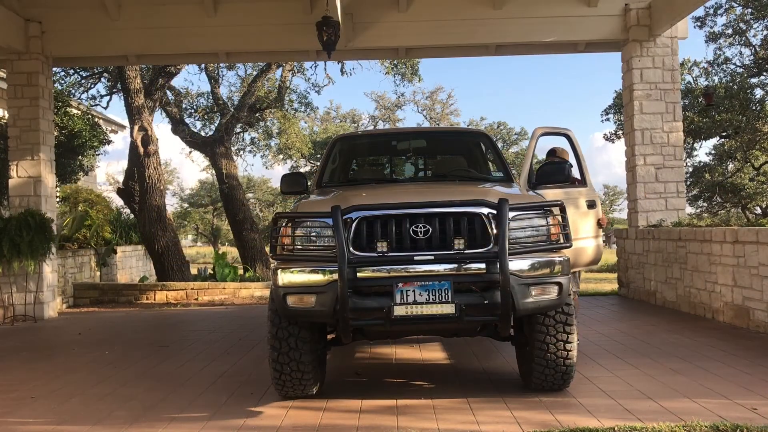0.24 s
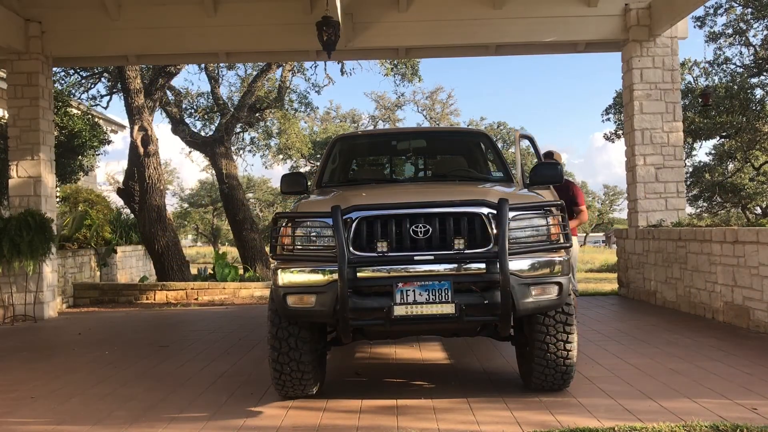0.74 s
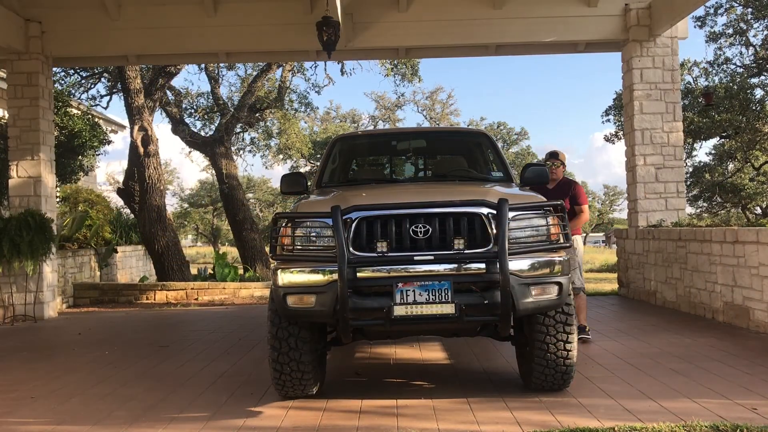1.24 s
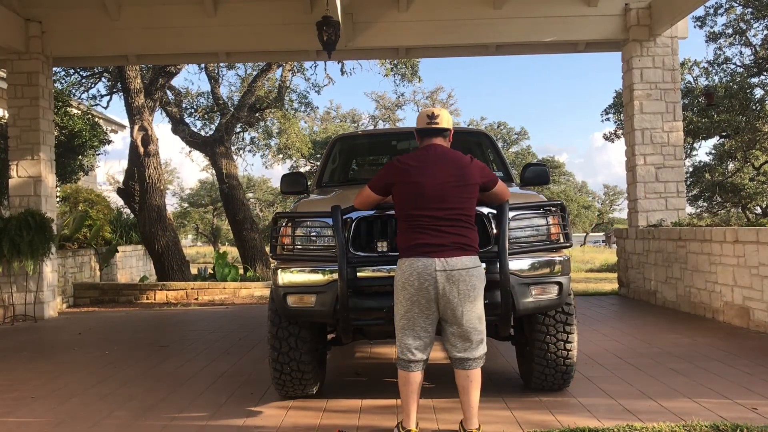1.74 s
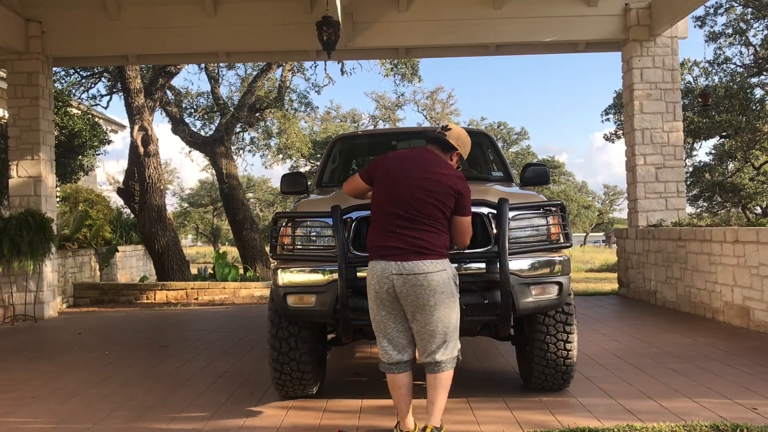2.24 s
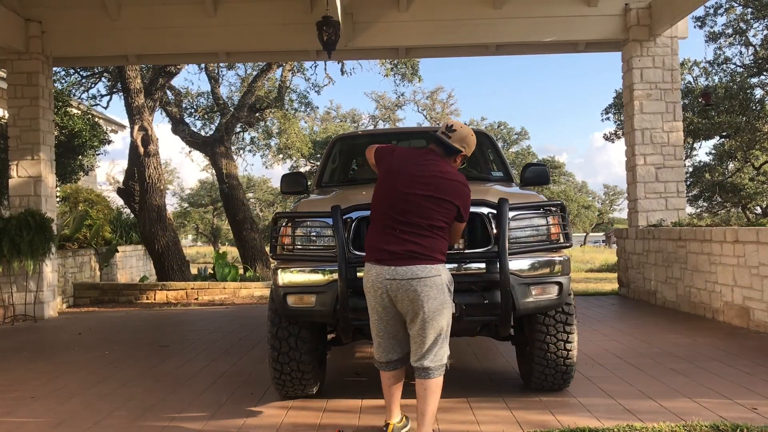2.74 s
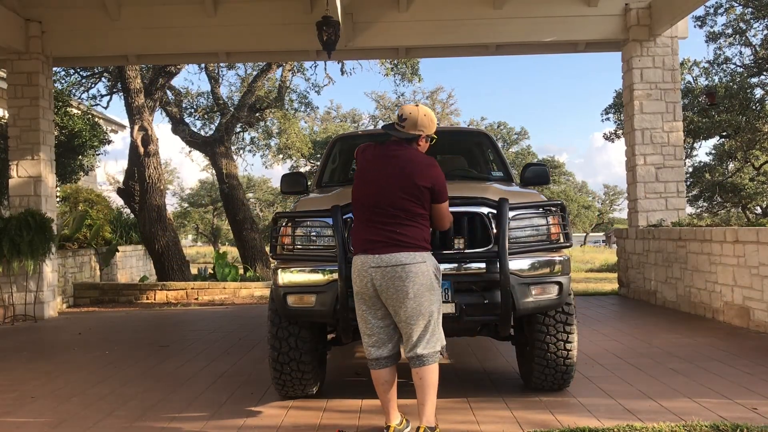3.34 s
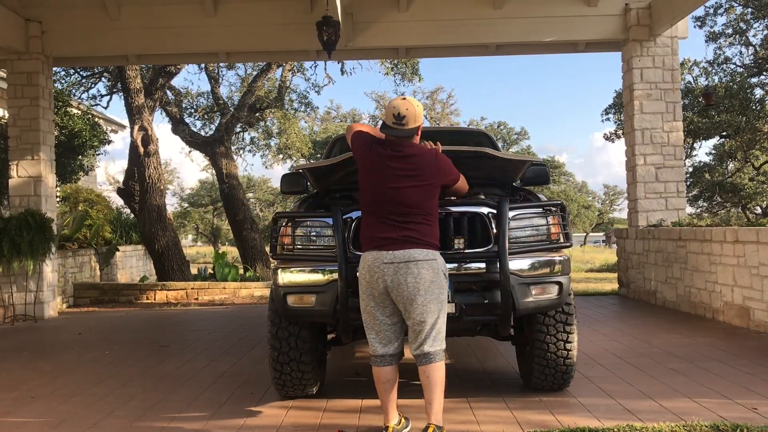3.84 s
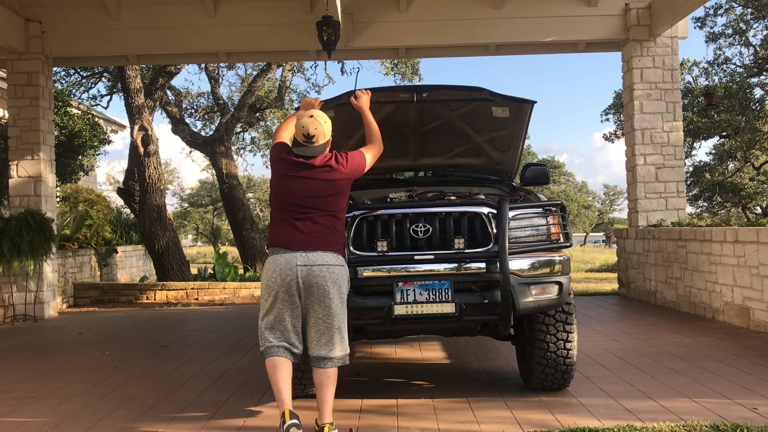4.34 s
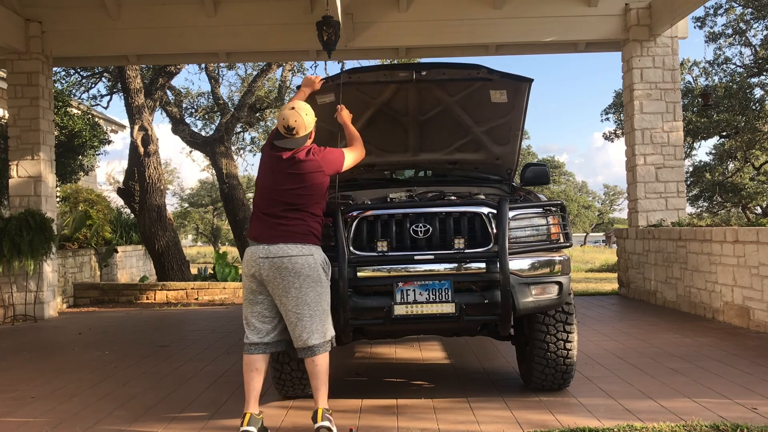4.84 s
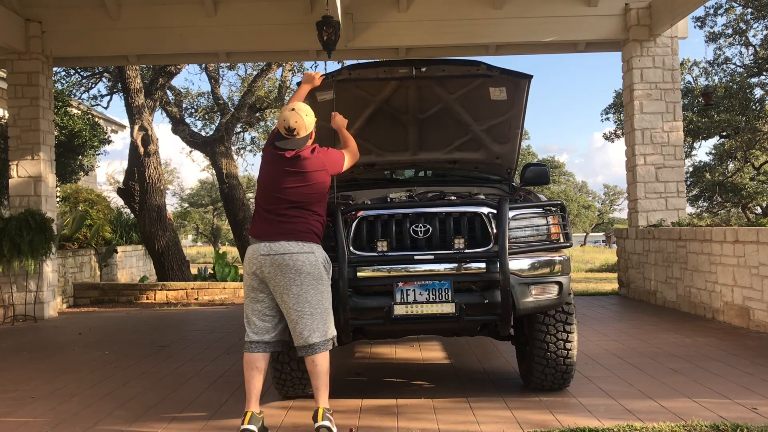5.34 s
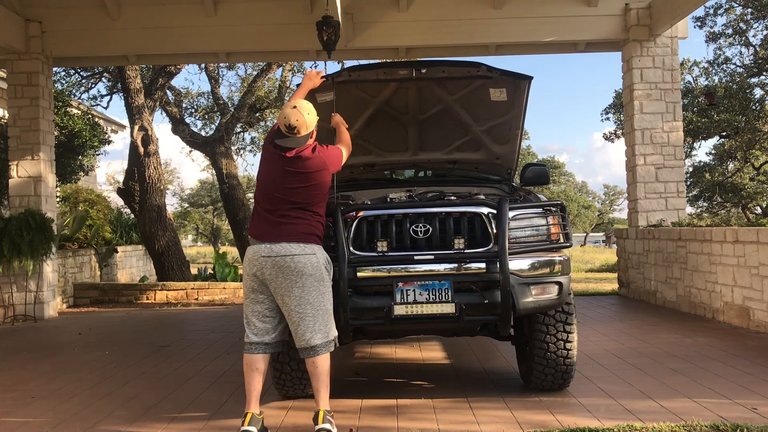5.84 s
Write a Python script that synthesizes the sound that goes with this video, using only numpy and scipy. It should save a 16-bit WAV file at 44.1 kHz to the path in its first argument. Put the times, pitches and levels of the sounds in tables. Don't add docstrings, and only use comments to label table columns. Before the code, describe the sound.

Pickup door slams with a heavy thud under a stone carport, then a hood latch clacks free and a metal prop rod knocks into place.

```python
import sys
import numpy as np
from scipy import signal
from scipy.fft import rfft, irfft, next_fast_len
from scipy.io import wavfile
from scipy.ndimage import uniform_filter1d

SR = 44100
rng = np.random.default_rng(int(sys.argv[2]) if len(sys.argv) > 2 else 0)


def invert_db(level):
    return 10 ** (np.asarray(level, dtype=float) / 20)


def put_to_file(sound):
    columns = np.atleast_2d(sound).T
    safe = np.clip(columns, -1, 1)
    whole_steps = np.round(safe * 32767)
    wavfile.write(sys.argv[1], SR, whole_steps.astype(np.int16))


N = 269186
SKIN_HZ, FRAME_HZ, LATCH_HZ = 302, 646, 987


def unit(x):
    return x / np.sqrt(np.mean(x ** 2))


def peak(x, db):
    return x * invert_db(db) / np.max(np.abs(x))


def band(x, lo_hz, hi_hz, order=2):
    return signal.sosfilt(signal.butter(order, [lo_hz, hi_hz], "band", fs=SR, output="sos"), x)


def die_away(t, t60):
    return np.exp(-np.log(1000) * t / t60)


def gain_at(points, hz):
    f, db = np.transpose(points)
    return invert_db(np.interp(np.log(hz + 1), np.log(f), db))


def coloured(points):
    size = next_fast_len(N)
    hz = np.arange(size // 2 + 1) * SR / size
    spectrum = rfft(rng.standard_normal(size)) * gain_at(points, hz)
    return unit(irfft(spectrum, size)[:N])


def walk(rate):
    k = int(SR / rate)
    steps = np.repeat(rng.standard_normal(N // k + 1), k)
    return unit(uniform_filter1d(uniform_filter1d(steps, k), k)[:N])


def add(out, s, x):
    i = int(s * SR)
    out[i:i + len(x)] += x[:N - i]


def ring(hz, octaves, t60, t, count):
    shift, size = rng.uniform(-1.038, 1, size=(2, count, 1))
    place = np.linspace(-1, 1, count)[:, None] + shift / count
    f = hz * 2 ** (octaves * place)
    strength = size * (1.3 - place ** 2) * (f / hz) ** 0.091
    swing = np.sin(2 * np.pi * f * t)
    return np.sum(strength * swing * die_away(t * np.sqrt(f / hz), t60), axis=0)


def blows(table, panel_hz, t60, rise, gain_db):
    out, t = np.zeros(N), np.arange(SR // 4) / SR
    for s, db, panel_db, treble_db, decay in table:
        grit = rng.standard_normal(len(t)) * invert_db(3.55 * rng.exponential(size=len(t)))
        chatter = grit * np.exp(-t / max(decay, .001)) * np.minimum(t / rise, 1)
        clank = peak(band(chatter, 1370, 2644), -9.0)
        panel = ring(panel_hz, 1.1, t60, t[:3000], count=80)
        modes = peak(signal.fftconvolve(chatter, panel)[:len(t)], -9)
        wash = rng.standard_normal(len(t)) * np.exp(-t / (decay + 0.052 * t60))
        wash = wash * np.minimum(t / (2 * rise), 1)
        wash = peak(band(wash, panel_hz / 2.01, panel_hz * 1.49), 0)
        sheet = peak(modes + wash, panel_db - 0.5)
        top_hz = np.clip(5500 * invert_db(.25 * (treble_db + 25)), 4500, 14000)
        edge = peak(band(chatter, 2100, top_hz), treble_db + 18.0)
        first_touch = chatter * np.exp(-t / .004)
        snap = peak(band(first_touch, 6000, 15000, order=1), treble_db + 7)
        add(out, s - .5 * rise, invert_db(db + gain_db) * (clank + sheet + edge + snap))
    return out


def slams():
    # start in seconds, peak in dB, panel share in dB, treble share in dB, rattle decay in seconds
    skin = [
        (1.3018, -25.5, -6, -17, 0.0016),
        (3.2979, -47, 6, -14, 0.012),
        (3.6169, -16.5, -19, -25, 0.023),
        (3.6447, -26, -16, -45, 0.03),
        (3.6979, -25, -25.5, -40, .0055),
        (5.2616, -15.5, -40, -45.5, 0.0074),
    ]
    frame = [
        (3.0644, -31, -12, -50, 0.004),
        (5.5477, -29.5, -8.5, -48, 0.014),
        (5.6042, -35.5, -8.5, -23, 0.013),
        (5.7753, -31.5, -11.5, -37, .011),
        (6.0194, -28.5, -4.5, -25, 0.018),
    ]
    latch = [(1.8117, -30, -2.5, -10.5, 0.023), (3.0579, -29, -11, -17, 0.013),
             (3.2869, -43, 2.5, -16, 0.027), (3.6049, -15.5, -16.5, -28.5, 0.0023),
             (3.6114, -19.5, -12.5, -37.5, 0.005), (4.3824, -29, -20, -7.5, .007),
             (4.6247, -34.5, -16, -14, 0.011), (5.2512, -12.5, -14, -29.5, 0.01),
             (5.5558, -32.5, -8, -22, 0.012), (5.6396, -18, -15, -36, 0.018),
             (5.6544, -16, -12, -52, 0.012), (5.9939, -17.5, -2, -25, 0.0068),
             (6.0018, -26, 2.5, -21, 0.004)]
    out = np.zeros(N)
    for rows, hz in ((skin, SKIN_HZ), (frame, FRAME_HZ), (latch, LATCH_HZ)):
        out += blows(rows, hz, t60=0.11, rise=.003, gain_db=-1)
    return out


def drags():
    # start in seconds, peak in dB, panel share in dB, treble share in dB, rattle decay in seconds
    skin = [
        (1.3292, -25.5, -7.5, -18.5, 0.029),
        (1.4194, -29.5, -25, -26, 0.15),
        (1.7393, -33.5, -2.5, -33, 0.029),
        (1.8304, -29.5, -13.5, -25, 0.028),
        (1.8689, -36.5, -10.5, -19, 0.054),
    ]
    frame = [
        (1.2894, -30, -1, -34, 0.0098),
        (1.3058, -15.5, -11.5, -24, 0.055),
        (1.3694, -25.5, -7, -25, .022),
        (1.708, -35.5, -5.5, -21.5, 0.048),
        (1.7576, -37, -27, -40, 0.072),
        (3.0755, -34, -28, -36, 0.097),
        (3.3304, -47.5, -9.5, -28, 0.081),
        (5.5292, -44.5, 3.5, -29, 0.083),
    ]
    latch = [
        (2.1715, -43, -38, -21, 0.016),
        (2.3544, -40, -16, -30, 0.039),
        (2.4134, -45, -11, -26, 0.029),
        (2.5626, -46.5, -28, -36, 0.026),
        (2.8429, -47, -20, -16, 0.014),
        (4.1829, -39, -16, -32, 0.021),
        (4.1989, -34.5, -14.5, -32, 0.029),
        (4.2444, -45, -9, -16, 0.084),
    ]
    out = np.zeros(N)
    for rows, hz in ((skin, SKIN_HZ), (frame, FRAME_HZ), (latch, LATCH_HZ)):
        out += blows(rows, hz, t60=0.11, rise=.012, gain_db=-1.5)
    return out


def hood():
    # pitch in Hz, level in dB, t60 in seconds
    hood_modes = [(369, 8, 0.22), (677, -6.5, .13), (922, -6.5, 0.27), (941, -12, 0.32), (1166, 1.5, .09),
                  (1211, 5.5, 0.047), (1580, -5.5, 0.066), (1687, -4.5, 0.048), (1857, -9.5, 0.19),
                  (2158, -5.5, 0.084), (2273, -18, 0.24), (2425, -7, 0.076)]
    # start in seconds, peak in dB, favoured pitch in Hz, spread in octaves, contact time in seconds
    knocks = [
        (3.057, -44, 2190, 0.28, 0.015),
        (3.606, -27.5, 2220, .4, 0.023),
        (4.19, -44.5, 1380, 0.76, 0.033),
        (5.2515, -23.5, 2100, 1.22, 0.011),
        (5.547, -36.5, 1200, 1.11, 0.016),
        (5.642, -29.5, 1410, 0.94, 0.016),
        (5.776, -42.5, 1700, 0.31, 0.0024),
        (5.9936, -21.5, 1050, 0.37, 0.0034),
    ]
    out, t = np.zeros(N), np.arange(SR // 4) / SR
    hz, mode_db, t60 = np.transpose(hood_modes)[:, :, None]
    for s, db, centre_hz, spread, contact in knocks:
        mix_db = mode_db - 6 * (np.log2(hz / centre_hz) / spread) ** 2
        modes = invert_db(mix_db) * np.sin(2 * np.pi * hz * t) * die_away(t, t60)
        rattle = rng.standard_normal(2000) ** 3 * np.exp(-t[:2000] / contact)
        add(out, s, peak(signal.fftconvolve(modes.sum(axis=0), rattle), db))
    return out


def thuds():
    # start in seconds, peak in dB, pitch in Hz, t60 in seconds
    shakes = [(1.298, -26.5, 186.7, 0.39), (1.3, -18.5, 546, 0.15), (1.302, -25, 93.7, 0.36),
              (1.312, -19, 53, 0.2), (1.362, -22, 66, 0.22), (1.437, -25.5, 48.6, 0.5),
              (1.451, -32.5, 120, 0.17), (1.567, -31.5, 56.3, 0.15), (1.62, -32, 52.7, 0.054),
              (1.728, -30, 116, 0.16), (1.818, -32.5, 217, 0.054), (1.706, -37.5, 279, 0.22),
              (1.781, -43, 89, 0.45), (1.809, -34, 132.3, 0.5), (3.29, -40, 166.3, 0.37),
              (3.472, -45, 654, .08), (3.485, -46, 473, 0.13), (3.622, -44.5, 200, 0.43),
              (4.62, -40.5, 295, 0.014)]
    out, t = np.zeros(N), np.arange(SR // 2) / SR
    for s, db, hz, t60 in shakes:
        push = np.hanning(int(SR / hz / 3))
        main = np.sin(2 * np.pi * hz * t) * die_away(t, t60)
        neighbours = ring(hz, min(0.0023 * hz, .45), t60, t, count=5)
        body = main + invert_db(-5) * neighbours
        add(out, s, peak(signal.fftconvolve(push, body), db))
    return out


def ticks():
    # start in seconds, peak in dB, colour in Hz, treble in dB, share in the room in dB
    contacts = [(2.074, -39.5, 3300, -10, 5), (2.106, -34, 3340, -16, 6), (2.267, -29.5, 3140, -26, 5),
                (2.395, -29, 1140, -37, -4), (2.412, -36, 2270, -28, -2), (3.78, -5, 2300, -5.5, -4.5),
                (3.862, -42, 5000, 8, -14), (4.028, -51, 2900, -23, 9), (4.041, -36, 3600, -12, 0),
                (4.095, -37.5, 3400, -14, -12), (4.164, -29.5, 2510, -32, 11), (4.347, -28, 2520, 2, 7),
                (4.491, -35, 2330, -32, 4), (4.62, -21, 2340, -38, -30), (4.857, -35, 5000, -2, -16)]
    direct, far, step = np.zeros(N), np.zeros(N), signal.unit_impulse(400)
    for s, db, hz, treble_db, room_db in contacts:
        tone = peak(band(step, 0.4 * hz, 1.01 * hz), db - 10.0)
        treble = peak(band(step, 3300, 7000, order=1), db + treble_db - 8.5)
        tick = tone + treble
        add(direct, s, tick)
        add(far, s, tick * invert_db(room_db))
    return direct, far


def squeaks():
    # start in seconds, length in seconds, pitch in Hz, level in dB
    tones = [(1.56, 0.035, 7200, -65), (1.578, 0.086, 6540, -68), (1.58, 0.037, 9150, -64),
             (1.894, 0.35, 453, -85.5), (3.85, 0.32, 174.5, -81), (4.261, 0.011, 5330, -60),
             (4.29, .015, 5200, -63), (4.313, 0.0072, 5450, -63), (4.395, 0.0076, 5070, -46.5),
             (4.416, 0.007, 5540, -60), (5.599, 0.02, 5140, -60)]
    out = np.zeros(N)
    for s, length, hz, db in tones:
        n = int(length * SR)
        noise = rng.standard_normal(SR // 2)[:n + 4000]
        lo_hz, hi_hz = hz * (.994 - 0.00033 / length), hz * (1.006 + 0.00029 / length)
        tone = unit(band(noise, lo_hz, hi_hz)[4000:])
        add(out, s, invert_db(db + 9) * tone * signal.windows.tukey(n, .4))
    return out


def carport(x):
    # middle of the band in Hz, t60 in seconds, level in dB
    room = [(120, 0.97, -1), (357, 0.61, -2), (930, 0.5, -8), (2300, 0.51, -8.5), (3750, 0.51, -11.5),
            (7500, 0.19, -9)]
    # delay in seconds, level in dB
    echoes = [
        (.006, -29),
        (.011, -31.5),
        (.02, -33),
        (.031, -22),
    ]
    t = np.arange(int(.8 * SR)) / SR
    tail = np.zeros(len(t))
    for hz, t60, db in room:
        noise = band(rng.standard_normal(len(t)), hz / 1.47, hz * 1.384)
        tail += invert_db(db) * noise * die_away(t, t60)
    reply = invert_db(-31) * tail * np.minimum(t / 0.0021, 1)
    for s, db in echoes:
        reply[int(s * SR)] += invert_db(db)
    return signal.fftconvolve(x, reply)[:N]


def case(x):
    # pitch in Hz, gain in dB
    housing = [(40, 4), (1500, 3.5), (1950, 3), (2280, 16.5), (2550, 8.5), (2950, -0.5), (3600, -1.5),
               (4300, -9), (4900, -18.5), (6000, -18.5), (9000, -26), (16000, -28)]
    cep = irfft(np.log(gain_at(housing, np.arange(2049) * SR / 4096)))
    cep[1:2048] *= 2
    cep[2049:] = 0
    reply = irfft(np.exp(rfft(cep)))[:1024]
    return signal.fftconvolve(x, reply)[:N]


def wind():
    # time in seconds, breeze level in dB
    breeze = [(0, -60), (.3, -57.5), (.6, -47.5), (.95, -53.5), (1.25, -53.5), (1.85, -49.5), (2.05, -60),
              (3.0, -62), (3.4, -53.5), (3.9, -65.5), (5.08, -61.5), (5.3, -58.5), (5.9, -56), (6.1, -54)]
    # middle in seconds, level in dB, length in seconds, flutter share in dB
    eddies = [(0.037, -41, 0.083, -13.5), (.125, -53, 0.03, -5), (0.349, -42, 0.033, -24),
              (0.462, -42.5, .06, -8), (0.518, -42, 0.015, -5), (.588, -40.5, 0.019, -1.5),
              (0.662, -38.5, 0.03, -11), (0.754, -38.5, 0.048, -21), (0.91, -32, 0.025, -10),
              (0.991, -43, 0.1, -10), (1.052, -45, 0.021, -10), (1.161, -46.5, 0.054, -3.5),
              (2.34, -63, 0.026, -13), (2.604, -46, 0.025, -19), (2.758, -53, 0.034, -18),
              (3.058, -44.5, 0.038, -9), (3.11, -47, 0.027, -17), (3.592, -61, .04, -1),
              (3.824, -56, 0.025, -13), (4.22, -58, 0.025, -12), (4.85, -70, 0.03, 2),
              (5.386, -57, 0.025, -14), (5.514, -52, .035, -27), (5.712, -54, 0.053, 4),
              (5.749, -60, 0.043, 5), (5.839, -43, 0.023, -17), (5.898, -43, 0.035, -15),
              (5.947, -43.5, 0.02, -5), (6.026, -58, 0.026, 15)]
    t = np.arange(N) / SR
    push = band(rng.standard_normal(N), 37.5, 79.7, order=3)
    push_size = np.sqrt(uniform_filter1d(push ** 2, 1200))
    push = unit(push / (push_size + 0.3 * np.std(push)))
    flutter = unit(band(rng.standard_normal(N), 69.0, 169.0, order=3))
    low = invert_db(np.interp(t, *np.transpose(breeze)) - 0.5 * walk(25))
    high = low * invert_db(-7.5)
    for s, db, length, flutter_db in eddies:
        bell = invert_db(db) * np.exp(-(2 * (t - s) / length) ** 2)
        low = low + bell
        high = high + bell * invert_db(flutter_db)
    return low * push + high * flutter


def hum():
    # pitch in Hz, level in dB per Hz
    road = [(60, -34.5), (95, -8.5), (120, 2.5), (160, -22), (240, -12), (400, -20), (620, -16.5),
            (950, -13), (1250, -20), (1700, -28), (2050, -22), (2290, -13), (2800, -34), (3600, -33.5),
            (5500, -64.5)]
    level_db = -59.5 + 0.51 * walk(0.83) + 0.13 * walk(40)
    return invert_db(level_db) * coloured(road)


def hiss():
    # pitch in Hz, level in dB per Hz
    rush = [(3000, 5), (5000, 1), (7500, -2), (9600, -2.5), (10400, -7), (11300, -3), (15700, -3.5)]
    return invert_db(-75.5) * coloured([(800, -36.5)] + list(rush) + [(15900, -37)])


def scene():
    truck = slams() + drags() + squeaks() + hood()
    direct, far = ticks()
    through_case = case(truck + direct + carport(truck + far))
    return (through_case + thuds() + wind() + hum())[None]


def band_limit(x):
    return signal.sosfilt(signal.butter(12, 16370, fs=SR, output="sos"), x)


def record(dry):
    # time in seconds, fade out in seconds, fade in in seconds
    cuts = [
        (1.698, 0.0074, .02),
        (4.17, 0.037, .022),
        (6.104, 0.036, .02),
    ]
    x = signal.sosfilt(signal.butter(2, 37.3, "high", fs=SR, output="sos"), dry) + hiss()
    t = np.arange(N) / SR
    for s, down, up in cuts:
        x = x * np.clip(np.maximum((s - t) / down, (t - s) / up), .02, 1)
    return band_limit(x)


dry = scene()
out = record(dry)
put_to_file(out)
```